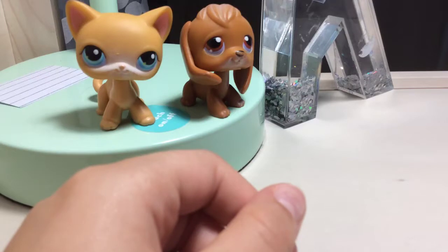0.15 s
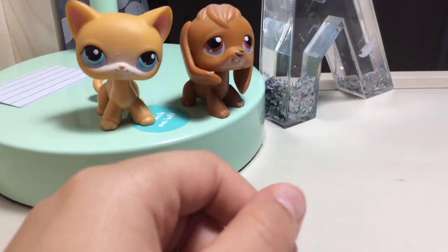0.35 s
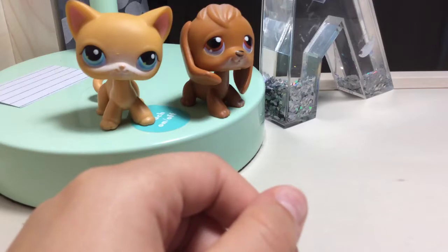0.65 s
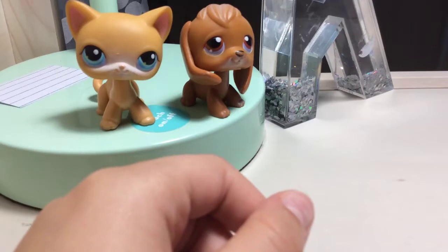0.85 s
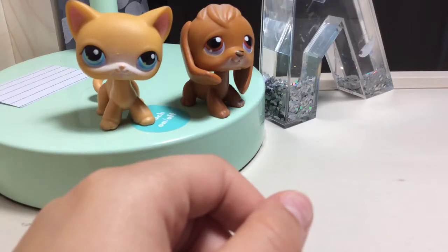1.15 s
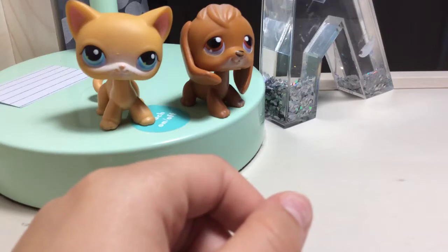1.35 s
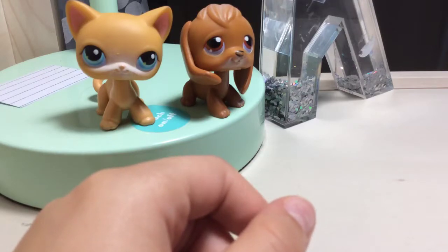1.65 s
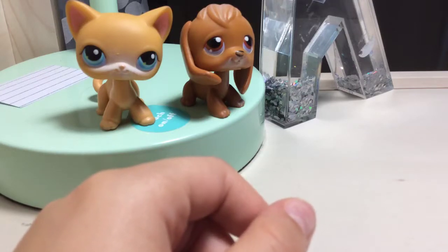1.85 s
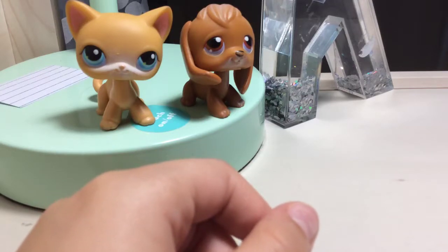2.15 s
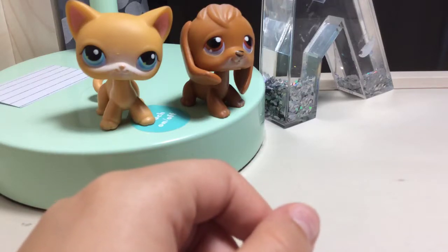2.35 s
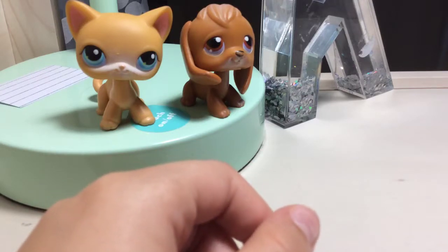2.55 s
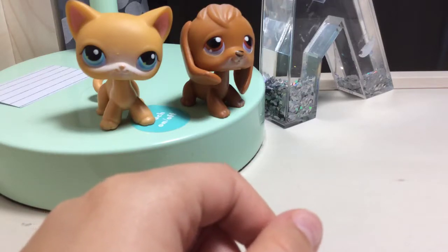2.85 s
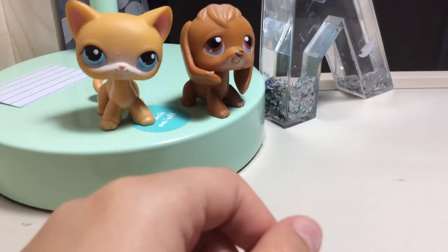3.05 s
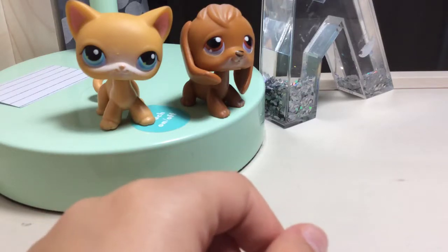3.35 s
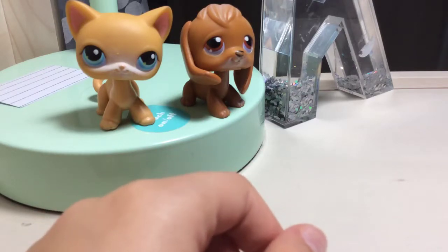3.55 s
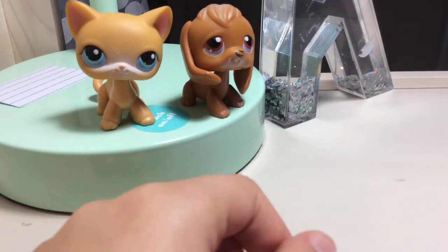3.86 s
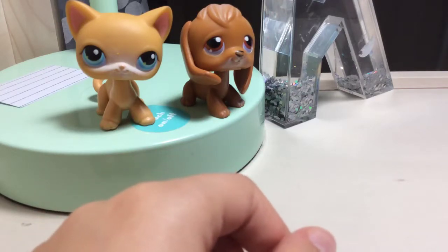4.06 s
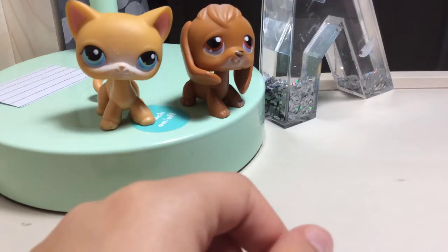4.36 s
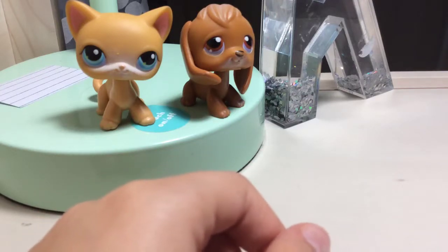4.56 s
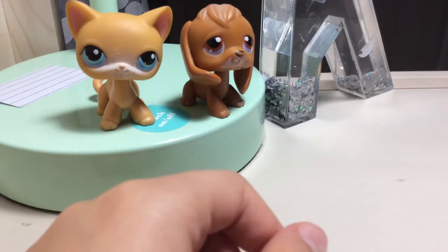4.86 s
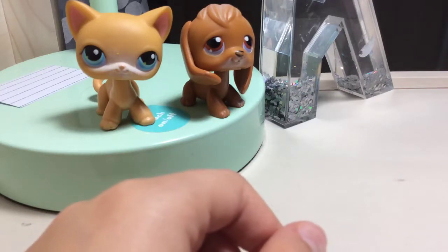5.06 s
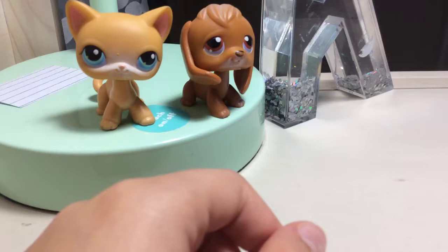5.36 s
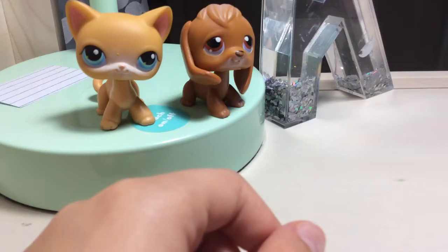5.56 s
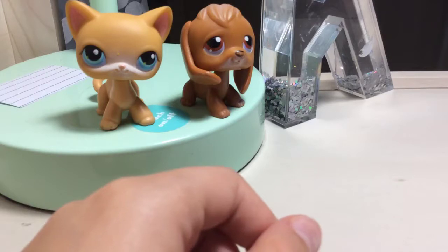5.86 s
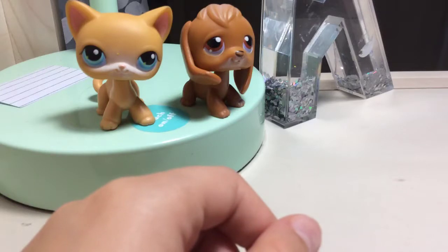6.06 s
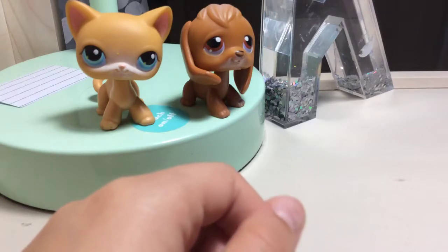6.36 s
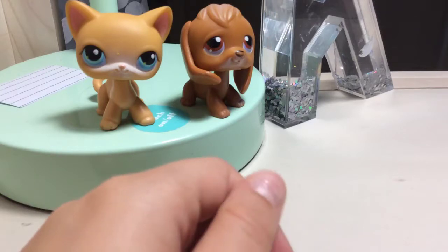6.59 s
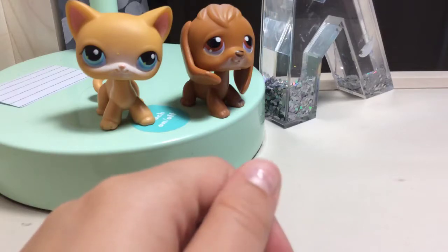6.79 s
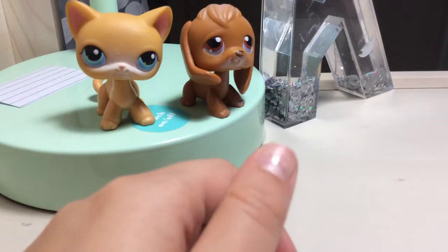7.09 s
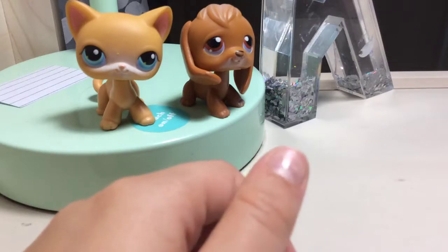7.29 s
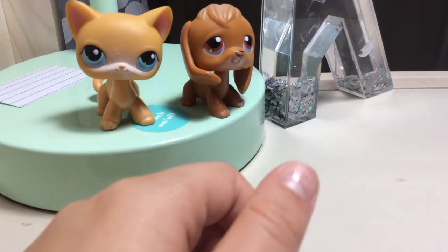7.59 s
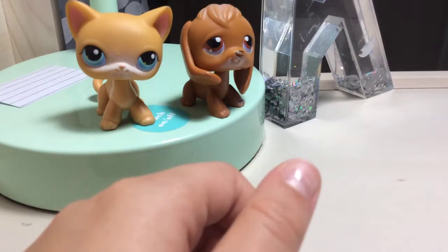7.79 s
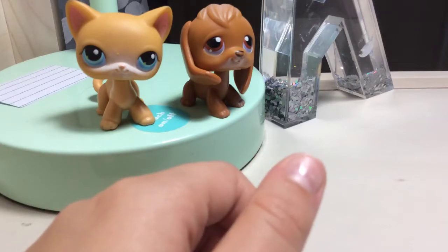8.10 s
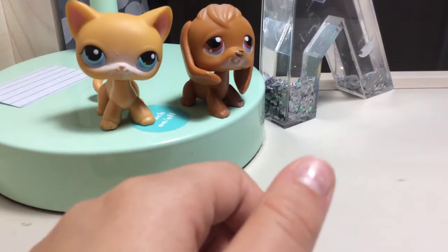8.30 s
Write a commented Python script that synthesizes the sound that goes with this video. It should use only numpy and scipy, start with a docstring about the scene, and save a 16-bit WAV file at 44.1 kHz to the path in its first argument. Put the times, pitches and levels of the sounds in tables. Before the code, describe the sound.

Very close skin-on-phone rubbing: gritty crackles, snagging scrapes and dull handling thumps, pausing about a second before a renewed rough burst.

```python
"""A quiet room, right beside a phone's microphone: fingers rub and scratch on the phone, resting in the middle.
Strokes grab, slacken and lift in a fine crackle of jerks; the skin snags and catches in clusters of tiny slips.
Each slip cluster excites a case response split into thud, scrape and hiss. The hand bumps the case with
dull noise thumps, a fingertip glides in airy noise, and dry ticks come from the resting grip.
A case ring and a short room tail follow the touches, over faint shaped noise."""
import sys
import numpy as np
from scipy import signal
from scipy.fft import rfft, irfft, next_fast_len
from scipy.io import wavfile
from scipy.ndimage import map_coordinates

SR = 44100
rng = np.random.default_rng(int(sys.argv[2]) if len(sys.argv) > 2 else 0)


def put_to_file(sound):
    """Save the sound as 16-bit audio at rate SR, in the file named by the first command-line argument."""
    columns = np.atleast_2d(sound).T  # one column per channel
    safe = np.clip(columns, -1, 1)
    whole_steps = np.round(safe * 32767)
    wavfile.write(sys.argv[1], SR, whole_steps.astype(np.int16))


N = 371951

# the skin snags and lets go, before the snag trim and the port:
# [release_s, scrape_db, thud_db relative to scrape, hiss_db relative to scrape]
SNAG_EVENTS = [(0.113, -30.5, -3.5, -12.5), (0.396, -21.5, 4, -18), (0.415, -21.5, -6.5, -12),
               (0.455, -15, 0.5, -9.5), (0.474, -19, 0.5, -14), (0.603, -15.5, -3, -12),
               (0.684, -20, -1.5, -9.5), (0.801, -26.5, 5, -18), (0.88, -26.5, -5, -7.5),
               (0.966, -15.5, -1, -17.5), (1.2, -23, 1.5, -17.5), (1.232, -26.5, -11, -9.5),
               (1.357, -27, -6, -8), (1.435, -20.5, 2, -7.5), (1.483, -19.5, -0.5, -14.5),
               (1.573, -18, -4.5, -15.5), (1.682, -11, -4, -11), (1.737, -25, -17, -20),
               (1.91, -22.5, -3, -35), (1.999, -18.5, -4, -16.5), (2.061, -24.5, -19, -18),
               (2.111, -28.5, -5, -14), (2.149, -23, -2.5, -10), (2.268, -19, -3.5, -9),
               (2.334, -15, -2.5, -16.5), (2.643, -24, -2, -15), (2.675, -21.5, -5, -10.5),
               (2.817, -27.5, -7, -14), (2.858, -32.5, -2, -6), (3.312, -20.5, 0.5, -19),
               (3.344, -22.5, 0, -7.5), (3.377, -18, -8, -16.5), (3.497, -23.5, -4, -5),
               (3.512, -22.5, -8, -20), (3.624, -30.5, -10, -4.5), (3.674, -25, -9, -17),
               (3.753, -22, -3, -25), (3.771, -21.5, -1.5, -17), (3.861, -31, -4, -24),
               (4.047, -28.5, -22, -22.5), (4.073, -33, -19, -17.5), (4.124, -29.5, -26, -31.5),
               (4.224, -36.5, 1, -24.5), (4.277, -31.5, -1, -22.5), (4.36, -34, 2.5, -26),
               (4.408, -22.5, -2.5, -14.5), (4.506, -22.5, 0, -23.5), (4.567, -19.5, -0.5, -20.5),
               (4.628, -27.5, -7, -25), (4.718, -41.5, -10.5, -22), (4.795, -35, -0.5, -35),
               (4.953, -16, -4, -20.5), (6.068, -41, -13, -32.5), (6.091, -38, -5.5, -27.5),
               (6.175, -43, -9.5, -31), (6.672, -29, -2.5, -25.5), (6.829, -48, -18.5, -27.5),
               (6.889, -46, -3, -27), (6.962, -38, 3.5, -20), (7.024, -26, 2.5, -25),
               (7.184, -37, -21, -24), (7.3, -17, -12, -21), (7.322, -19, -6.5, -20),
               (7.416, -19, -2.5, -13), (7.477, -11.5, -8, -24), (7.544, -26, -1, -12),
               (7.61, -27.5, -22, -31), (7.904, -21.5, -8, -19), (7.944, -15, -5.5, -18),
               (8.004, -22, -52, -14.5), (8.034, -14, -5.5, -18), (8.108, -20, -7, -22.5),
               (8.158, -22, -6.5, -26.5), (8.248, -35.5, 7.5, -28.5), (8.404, -30, -33, -18)]
LEVEL_SPAN_S = 0.01  # span that a cluster's energy is scaled to; also a snag's lead-in and the jerk spacing


def amp(db):
    """Decibels to amplitude ratio."""
    return 10 ** (np.asarray(db) / 20)


def unit(x):
    """The signal scaled to an RMS of one."""
    return x / np.sqrt(np.mean(x ** 2) + 1e-20)


def along(points, hz):
    """Read (Hz, value) points along a log frequency axis."""
    point_hz, values = np.transpose(points)
    return np.interp(np.log(hz + 1), np.log(point_hz), values)


def filtered(x, response):
    """Shape a signal by a response given as a function of frequency."""
    padded = next_fast_len(N + 8192)
    hz = np.fft.rfftfreq(padded, 1 / SR)
    return irfft(rfft(x, padded) * response(hz), padded)[:N]


def add(track, start_s, sound):
    """Mix a sound into the track, cut at the track's end."""
    part = track[max(round(start_s * SR), 0):][:len(sound)]
    part += sound[:len(part)]


def resonance(hz, centre_hz, width_hz):
    """Response of one damped mode, with unit gain at its centre."""
    return 1j * hz * width_hz / (centre_hz ** 2 - hz ** 2 + 1j * hz * width_hz)


def room_noise(level_db=-67.0):
    """Low murmur of the room with the microphone's own hiss, as one shaped noise."""
    # relative noise spectrum: [pitch_hz, density_db per Hz]
    noise_curve = [(35, -10.5), (90, 2), (280, -6.5), (500, -11.5), (1300, -23), (2200, -25.5), (6500, -28),
                   (9000, -22.5), (15500, -34)]
    noise = filtered(rng.standard_normal(N), lambda hz: amp(along(noise_curve, hz)))
    return amp(level_db) * unit(noise)


def slips(count, rate, spread_db):
    """Skin slips as random impulses of either sign and uneven size, rate a second."""
    happens = rng.random(count) < rate / SR
    sign = rng.choice([-1, 1], count)
    return happens * sign * amp(spread_db * rng.standard_normal(count))


def minimum_phase(magnitudes, size):
    """Causal answers with the given magnitudes, by folding the cepstrum so energy comes early."""
    cepstrum = irfft(np.log(magnitudes))
    fold = np.r_[1, np.full(size // 2 - 1, 2), np.zeros(size // 2)]
    return irfft(np.exp(rfft(cepstrum * fold)))


def case_answers(levels, ripple_db=2.5, skin_hz=1320, skin_db=6, soft_hz=110, soft_db=-47,
                 dull_hz=2000, dull_db=-33, light_db=-46, thin_hz=250, thin_slope=.55, size=2048):
    """The case's modes answer a slip at a fresh spot, split into thud, scrape and hiss."""
    # relative response of case and port, notched under the main resonance: [pitch_hz, level_db]
    case_curve = [(40, -34), (66, -13), (102, -0.5), (260, -1.5), (450, 1.5), (590, -2.5), (740, -2),
                  (930, -18.5), (1040, -8), (1290, -6), (1650, -17), (1880, -15.5), (2500, -23.5),
                  (3900, -23.5), (4400, -29), (7400, -38), (10000, -39.5), (16000, -56.5)]
    # narrow resonances of the microphone port: [centre_hz, width_hz, lift_db]
    port_modes = [(2967, 120, 5), (3377, 540, 6.5), (6500, 62, 3.5), (8260, 500, 6)]
    # corners of the crossfades from thud through scrape into hiss: [pitch_hz]
    band_corners = [300, 850, 1800, 6000]
    thud, scrape, hiss = levels
    hz = np.fft.rfftfreq(size, 1 / SR)
    octave = np.log2(hz + 1)
    db = along(case_curve, hz)
    for centre, width, lift in port_modes:
        db += lift / (1 + (2 * (hz - centre) / width) ** 2)
    # every spot favours other modes of the case
    db += ripple_db * map_coordinates(rng.standard_normal(size=80), [octave * 4], mode="mirror")
    # the patch of skin that lets go has its own pitch, scattered in octaves
    skin_octave = np.log2(skin_hz) + rng.normal(0, 0.28)
    db += skin_db * np.exp(-((octave - skin_octave) / .2) ** 2)
    # amplitude share of each band at the corners
    corner_shares = ([0.82, 0.3, 0.067, 0.012],  # thud
                     [0.0076, 0.81, 0.64, 0.14],  # scrape
                     [0.0016, 0.0026, 0, 0.97])  # hiss
    shares = np.array([np.interp(octave, np.log2(band_corners), w) for w in corner_shares])
    # a light touch stays long on the case and so thuds deeper
    thud_edge_hz = soft_hz * np.hypot(1, amp(thud - soft_db))
    shares[0] /= np.hypot(1, (hz / thud_edge_hz) ** 2)
    # a fleshy contact, with little hiss, also scrapes duller, and so does a light one
    scrape_edge_hz = dull_hz * np.sqrt(amp(hiss - scrape - dull_db) / (1 + amp(light_db - scrape)))
    shares[1] /= np.hypot(1, (hz / scrape_edge_hz) ** 4)
    # a thin contact, with little thud, loses the low end of its scrape too
    low_edge_hz = thin_hz * amp(thin_slope * min(scrape - thud, 24))
    shares[1] /= np.hypot(1, (low_edge_hz / (hz + 1)) ** 2)
    return minimum_phase(amp(db) * np.maximum(shares, .003), size)


def through_case(cluster, levels):
    """The case turns slips into thud, scrape and hiss, each scaled to its level in dB."""
    bands = signal.fftconvolve(cluster[None], case_answers(levels), axes=1)
    bands *= np.sqrt(LEVEL_SPAN_S * SR) / np.linalg.norm(bands, axis=1, keepdims=True)
    return amp(levels) @ bands


def friction(s, grab_db_per_s=802, sag_db_per_s=17, lift_db_per_s=261.5, even_db=-39, thud_slope=0.8):
    """(thud, scrape, hiss) dB of the dragging skin at time s; the strongest stroke rules."""
    # a finger drags across the case: [start_s, end_s, scrape_db at start, hiss_db relative to scrape]
    strokes = [(.01, .35, -66, -18), (0.397, 0.513, -30, -17.5), (0.526, .68, -43.5, -11),
               (0.68, 0.783, -31, -13.5), (0.792, 0.876, -22.5, -15), (0.976, 1.075, -28, -12.5),
               (1.08, 1.255, -40.5, -24), (1.288, 1.546, -31.5, -22), (1.59, 1.815, -33.5, -19.5),
               (1.817, 2.061, -29.5, -15.5), (2.123, 2.142, -21.5, -20.5), (2.289, 2.408, -26, -14),
               (2.571, 2.713, -42.5, -18), (2.864, 2.876, -38.5, -14), (3.035, 3.055, -51.5, -19.5),
               (3.056, 3.24, -61, -9.5), (3.257, 3.31, -33, -20), (3.32, 3.41, -25, -17.5),
               (3.44, 3.613, -36.5, -19.5), (3.632, 3.738, -29, -15.5), (3.832, 3.956, -51.5, -21.5),
               (4.03, 4.09, -45, -21), (4.174, 4.474, -37.5, -22), (4.492, 4.546, -28.5, -21.5),
               (4.617, 4.632, -34, -24), (4.781, 4.836, -54, -13.5), (4.963, 4.98, -40, -24),
               (6.385, 6.655, -68.5, -13), (6.925, 7.025, -44, -24), (7.132, 7.22, -56.5, -16),
               (7.233, 7.28, -43, -19), (7.28, 7.34, -28.5, -13), (7.371, 7.476, -25, -15),
               (7.534, 7.735, -29, -23), (7.753, 7.91, -37.5, -25), (7.92, 8.07, -30, -13),
               (8.074, 8.143, -34, -16.5), (8.245, 8.4, -49.5, -23.5), (8.413, 8.427, -32, -25)]
    start, end, strength, bright = np.transpose(strokes)
    # a stroke rises fast, slackens slowly, then dies as the finger lifts
    grab = grab_db_per_s * np.maximum(start - s, 0)
    sag = sag_db_per_s * np.maximum(s - start, 0)
    lift = lift_db_per_s * np.maximum(s - end, 0)
    level = strength - grab - sag - lift
    strongest = np.argmax(level)
    scrape = max(level[strongest], -120)
    # thud equals scrape at even_db and changes less steeply
    thud = even_db + thud_slope * (scrape - even_db)
    return np.array([thud, scrape, scrape + bright[strongest]])


def drag(scatter_db=2.0, t60=0.045, rise=0.0022, stick_s=0.0075, stick_db=-7, size=2048):
    """The finger creeps in small uneven jerks, each a cluster of slips of the skin's ridges."""
    track, t = np.zeros(N), np.arange(size) / SR
    envelope = (1 - np.exp(-t / rise)) * amp(-60 * t / t60)
    releases = np.r_[np.sort(np.transpose(SNAG_EVENTS)[0]), np.inf]
    for beat in np.arange(0, N / SR, LEVEL_SPAN_S):
        s = beat + LEVEL_SPAN_S * rng.uniform(-1, 0.46)
        # the skin sticks and falls quieter just before a snag lets go
        wait = releases[np.searchsorted(releases, s)] - s
        levels = friction(beat) + stick_db * np.exp(-wait / stick_s)
        levels = levels + scatter_db * rng.standard_normal(size=3)
        cluster = slips(size, rate=2600, spread_db=2.5) * envelope
        add(track, s, through_case(cluster, levels))
    return track


def burst(t, t60, rise, lead=0.003, lead_db=-18):
    """Envelope of a snag: the skin creaks for a moment, lets go, then relaxes."""
    after = np.maximum(t - LEVEL_SPAN_S, 0)
    creak = amp(lead_db) * np.exp(-np.abs(t - LEVEL_SPAN_S) / lead)
    return creak + (1 - np.exp(-after / rise)) * amp(-60 * after / t60)


def catches(rate=12, over_drag_db=2, thud_db=-3, hiss_db=4, scatter_db=2, size=2048):
    """Dragging skin catches rate times a second: small, bright snags that follow the stroke's strength."""
    track = np.zeros(N)
    envelope = burst(np.arange(size) / SR, t60=0.015, rise=0.00031)
    for beat in np.arange(0, N / SR, 1 / rate):
        s = beat + rng.random() / rate
        levels = friction(s) + over_drag_db + scatter_db * rng.standard_normal()
        levels = levels + np.array([thud_db, 0, hiss_db])
        cluster = slips(size, rate=3000, spread_db=7.5) * envelope
        add(track, s - LEVEL_SPAN_S, through_case(cluster, levels))
    return track


def snags(size=2600, trim_db=1.99, base_t60=0.079, flesh_stretch=0.24):
    """Each snag is a quick burst of slips that fades as the skin relaxes; fleshy ones last longer."""
    track, t = np.zeros(N), np.arange(size) / SR
    for s, strength, thud, hiss in SNAG_EVENTS:
        # dB of lengthening per dB of thud, so thin contacts are short clicks
        t60 = base_t60 * amp(flesh_stretch * thud)
        cluster = slips(size, rate=4500, spread_db=3.0) * burst(t, t60, rise=0.0007)
        levels = trim_db + strength + np.array([thud, 0, hiss])
        add(track, s - LEVEL_SPAN_S, through_case(cluster, levels))
    return track


def port(x, corner_hz=9200, body_hz=750, body_loss=0.39):
    """A finger close to the port shades the highest treble and adds body; moving off brightens and thins."""
    # the grip opens and closes over the port: [time_s, treble_lift_db]
    opening = [(1.2, -2.5), (3.2, 0), (3.8, -3), (4.25, 7.5), (4.7, -1.5), (6.9, -1.5), (7.35, 3.5),
               (7.7, 6), (8.1, 9)]
    lift_db = np.interp(np.arange(N) / SR, *np.transpose(opening))
    treble = filtered(x, lambda hz: hz ** 4 / (hz ** 4 + corner_hz ** 4))
    body = filtered(x, lambda hz: body_hz ** 4 / (hz ** 4 + body_hz ** 4))
    # body_loss: dB of body lost per dB of opening, as the grip loosens
    return x + (amp(lift_db) - 1) * treble + (amp(-body_loss * lift_db) - 1) * body


def bumps(rise=.006, rock_hz=100, rock_width_hz=30, flesh_hz=450, low_cut_hz=74, size=16000):
    """Soft pushes rock the phone at its low resonance in the hand; the flesh damps the highs."""
    # the hand shifts its hold: [start_s, fade_s (Gaussian), level_db before rise and low cut]
    pushes = [(0.964, 0.0099, -27), (2.317, 0.039, -19), (3.028, 0.042, -34), (3.205, 0.026, -29),
              (3.254, 0.16, -26.5), (4.037, 0.014, -29), (4.391, 0.013, -27.5), (6.185, 0.021, -42.5),
              (6.348, .1, -50.5), (6.579, 0.11, -46), (7.318, .02, -17), (8.249, .14, -40.5)]
    track, t = np.zeros(N), np.arange(size) / SR
    for s, fade_s, db in pushes:
        add(track, s, amp(db) * (1 - np.exp(-t / rise)) * np.exp(-(t / fade_s) ** 2))

    def rocking(hz):
        return resonance(hz, rock_hz, rock_width_hz) / (1 + 1j * hz / flesh_hz) ** 2

    thumps = track * unit(filtered(rng.standard_normal(N), rocking))
    # the microphone takes little of the thumps below the low cut
    low_cut = signal.butter(4, low_cut_hz, "highpass", fs=SR, output="sos")
    return signal.sosfilt(low_cut, thumps)


def glides(centre_hz=10000, width_hz=6000):
    """Skin that slides freely makes a smooth, airy hiss that swells and fades."""
    # a fingertip glides without gripping: [start_s, length_s, level_db at the top of the swell]
    slides = [(3.002, .27, -65), (6.33, 0.26, -77)]
    swell = np.zeros(N)
    for s, length, db in slides:
        add(swell, s, amp(db) * np.sin(np.pi * np.arange(0, length, 1 / SR) / length))
    air = filtered(rng.standard_normal(N), lambda hz: resonance(hz, centre_hz, width_hz))
    return swell * unit(air)


def ticks(t60=0.016, low_hz=1800, high_hz=9000, trim_db=-1):
    """Skin that barely moves gives short bright ticks: decaying noise, band-limited."""
    # tiny dry ticks while the grip rests: [start_s, level_db before trim and filter]
    tick_events = [(5.5603, -49), (6.4641, -54.5), (6.4943, -49), (6.5495, -50.5), (6.5805, -39.5),
                   (6.6186, -43)]
    track, t = np.zeros(N), np.arange(1024) / SR
    for s, db in tick_events:
        add(track, s, amp(db + trim_db - 60 * t / t60) * rng.standard_normal(len(t)))

    def bright(hz):
        return hz ** 2 / (hz ** 2 + low_hz ** 2) / np.hypot(1, (hz / high_hz) ** 2)

    return filtered(track, bright)


def after_ring(x, ring_hz=1330, width_hz=170, t60=.36, level_db=-39):
    """The main resonance of the case rings on faintly after each touch, as a decaying narrow noise."""
    t = np.arange(SR // 2) / SR
    ring = filtered(rng.standard_normal(N), lambda hz: resonance(hz, ring_hz, width_hz) ** 2)
    tail = ring[:len(t)] * amp(-60 * t / t60)
    return amp(level_db) * signal.fftconvolve(x, tail / np.linalg.norm(tail))[:N]


def room(x):
    """The room answers with a diffuse noise tail; the treble lingers a little longer."""
    # reverberation time: [pitch_hz, t60_s]
    decay_times = [(150, 0.28), (1300, 0.29), (8000, 0.37)]
    hz, t, z = signal.stft(rng.standard_normal(SR // 2), SR, nperseg=256)
    decay = amp(-60 * t / along(decay_times, hz)[:, None])
    tail = signal.istft(z * decay, SR, nperseg=256)[1]
    return signal.fftconvolve(x, tail / np.linalg.norm(tail))[:N]


def scene():
    """The rubbing, the ring of the case, the faint answer from the room, and the background."""
    rubbing = port(snags() + drag() + catches())
    fingers = rubbing + bumps() + glides() + ticks()
    return (fingers + after_ring(fingers) + amp(-14.0) * room(fingers) + room_noise())[None]


def record(dry, top_hz=16000):
    """The phone rounds off the highest peaks and keeps nothing above its band limit."""
    rounded = dry[0] / (1 + dry[0] ** 6) ** (1 / 6)
    return filtered(rounded, lambda hz: hz < top_hz)[None]


dry = scene()
out = record(dry)
put_to_file(out)
```